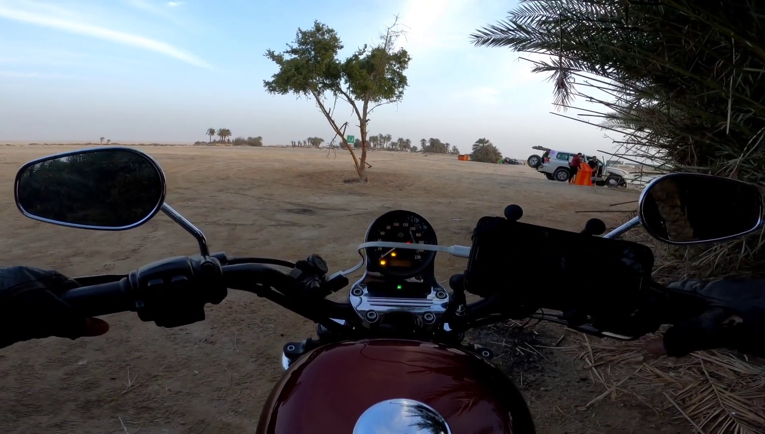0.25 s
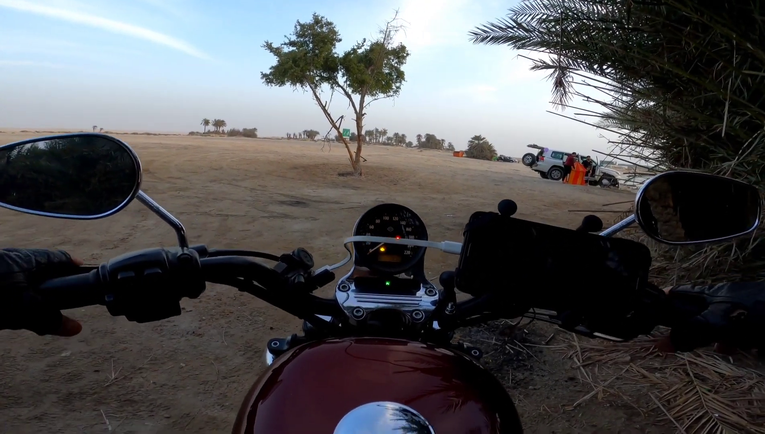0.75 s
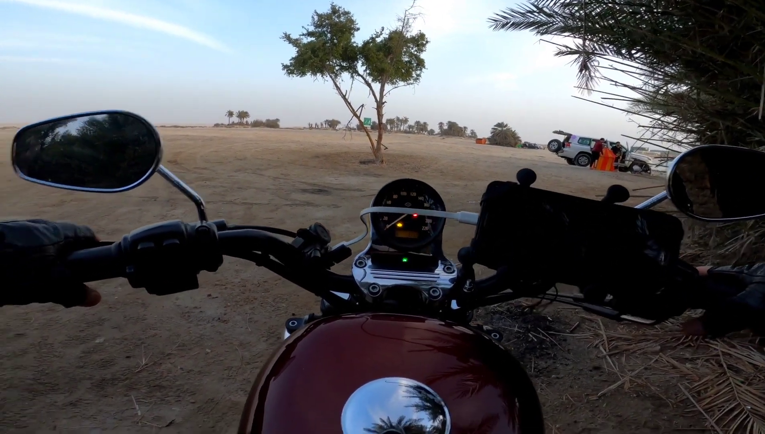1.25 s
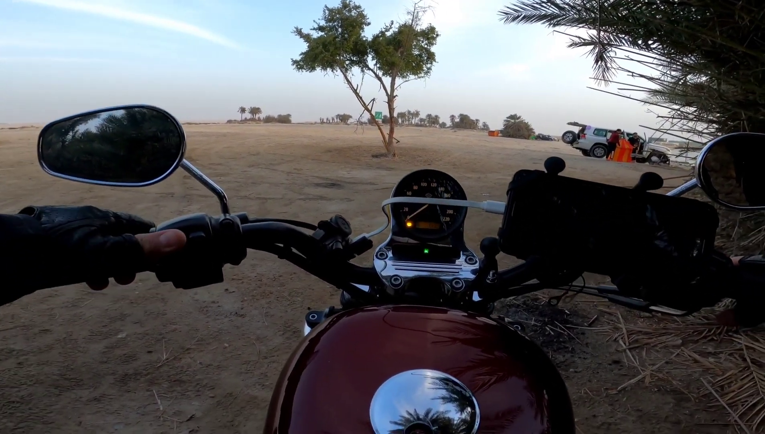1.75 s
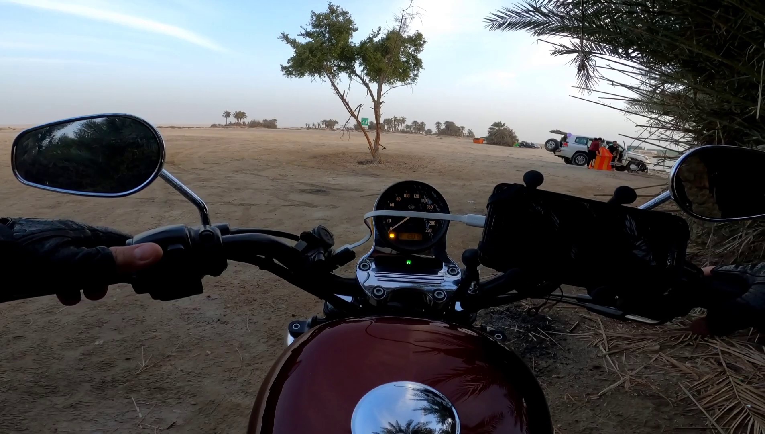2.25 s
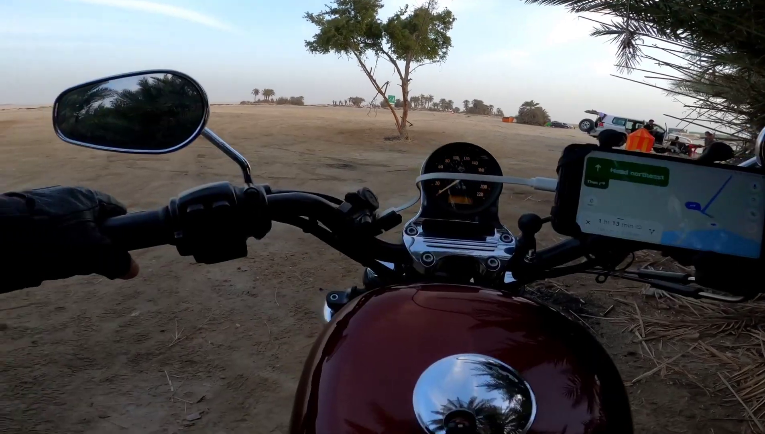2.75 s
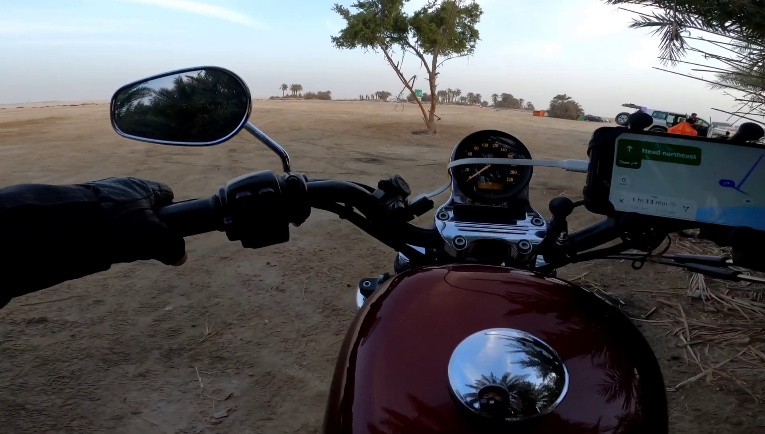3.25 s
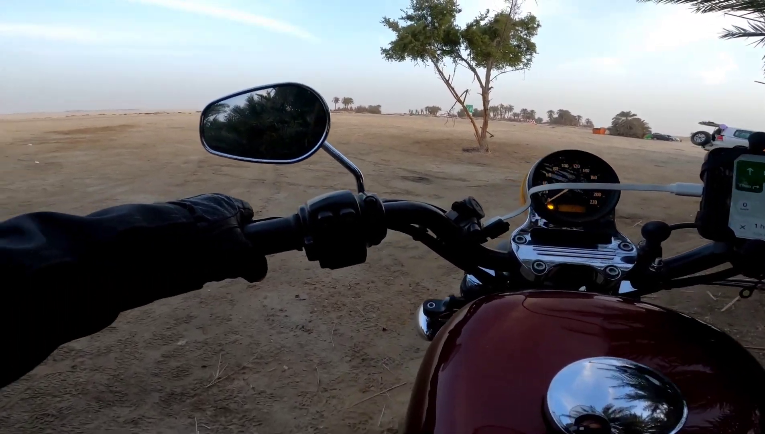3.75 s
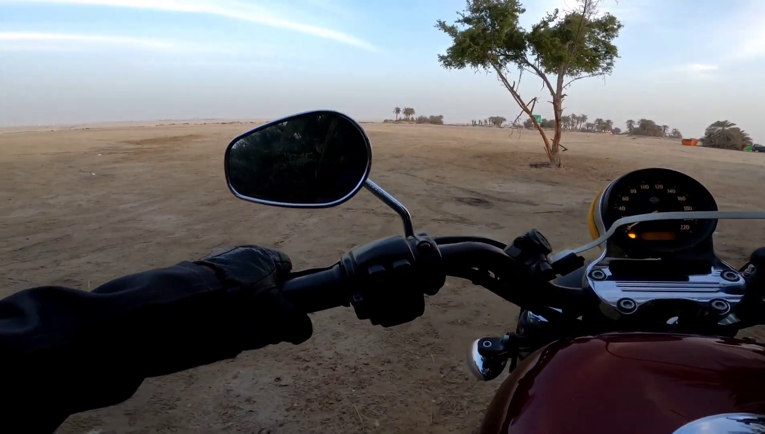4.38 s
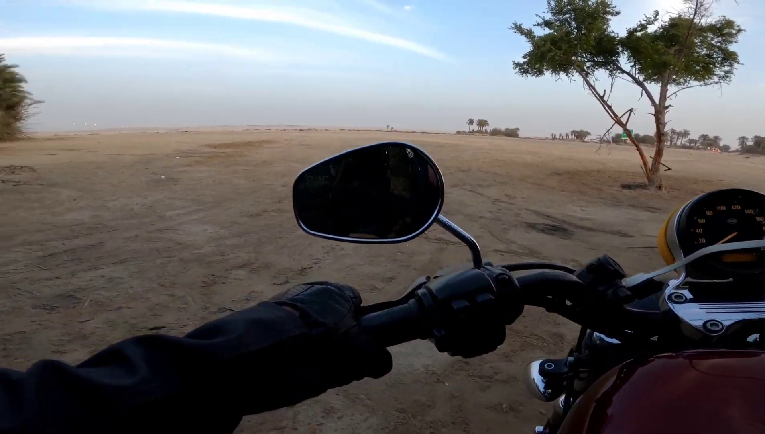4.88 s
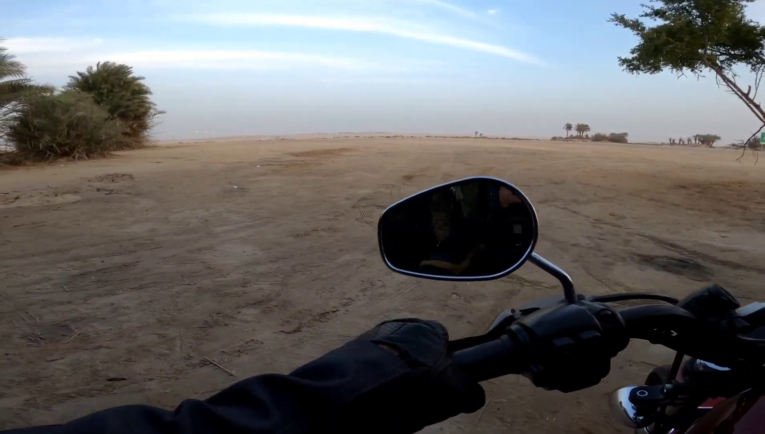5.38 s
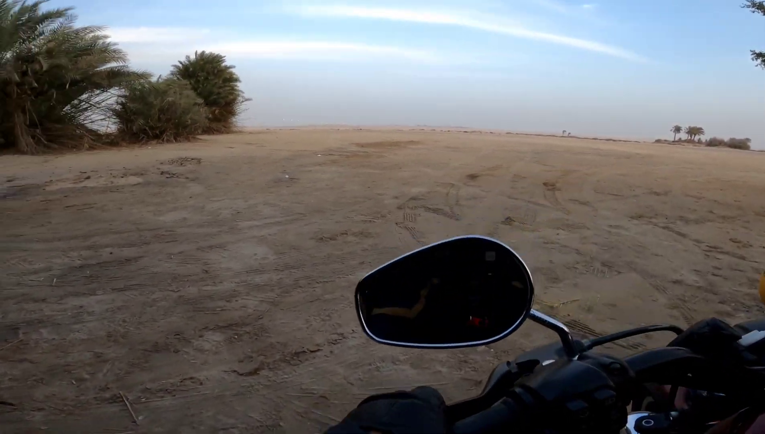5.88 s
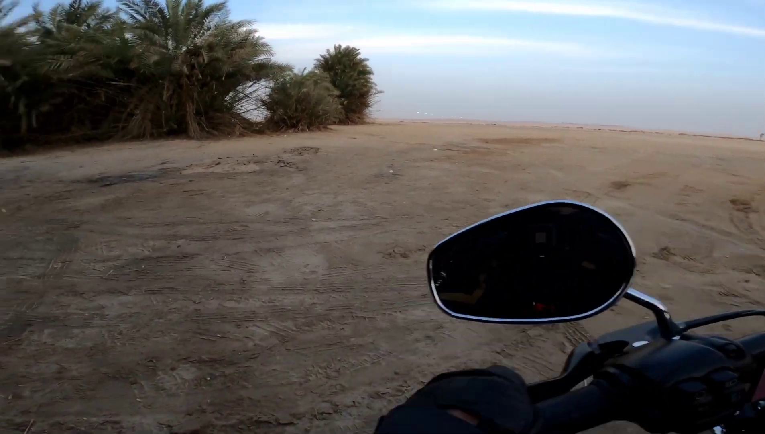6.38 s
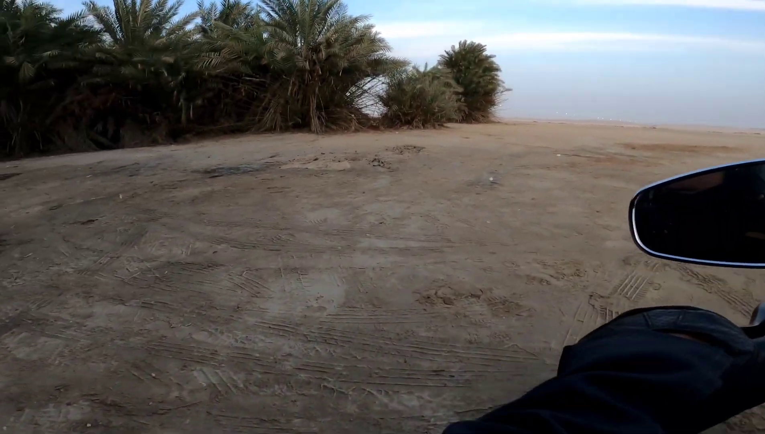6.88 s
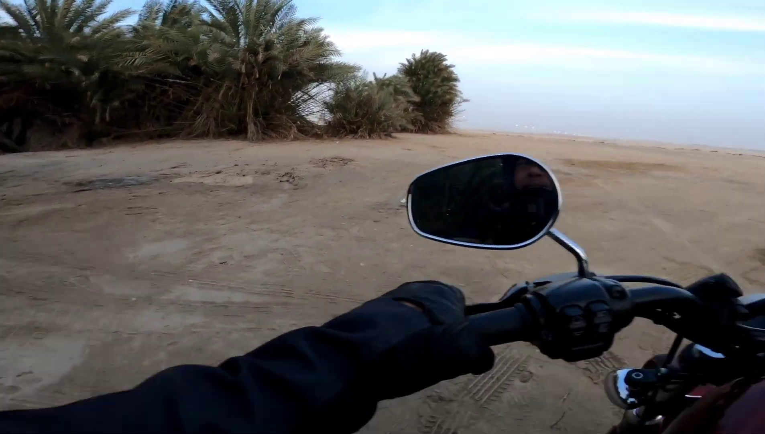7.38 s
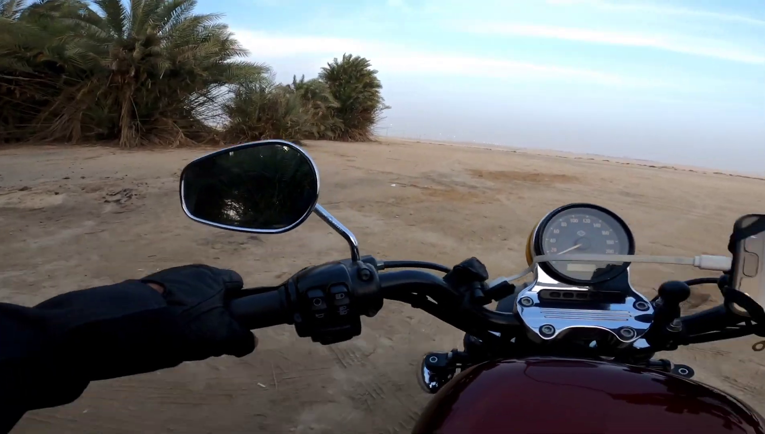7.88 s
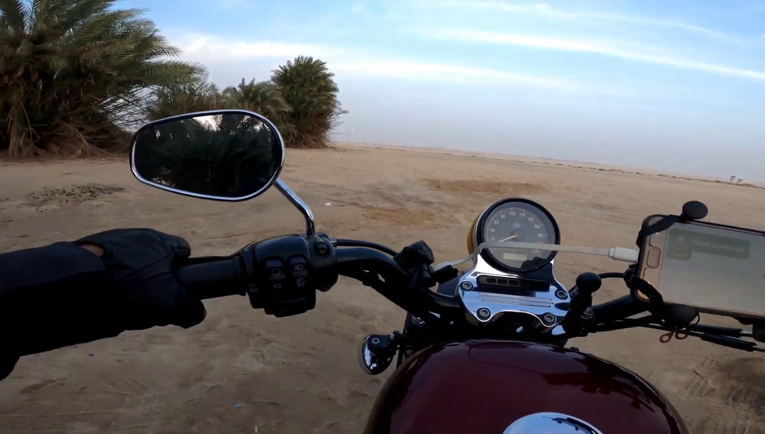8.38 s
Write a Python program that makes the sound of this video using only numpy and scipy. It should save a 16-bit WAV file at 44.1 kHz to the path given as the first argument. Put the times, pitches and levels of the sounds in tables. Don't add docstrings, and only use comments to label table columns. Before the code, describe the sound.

Close helmet perspective on a large twin-cylinder motorcycle in dry open air. At 0 seconds the starter cranks with a thin whirr; around 0.15-0.2 the pinion clanks in a quick cluster of bounces. The engine catches by 0.35, flares to its fastest near 0.75, then eases into a loud, lumpy idle until 2.67: deep uneven exhaust thuds, air gulps, rattling cases, ringing fins and a few skipped beats. A gap of about a hundredth of a second marks a scene change. The engine returns slightly quieter, swelling with a growl near 3.7, falling back by 4.4, then wavering. Misfires cluster from 4.3 to 5.6. It dips near 5.55, surges at 6.3, and rises again near 8.0 before settling. Bright valve hiss strengthens toward 7 while the bark softens, then reverses. Faint loose-part knocks and one grit tick dot the ride, which stops abruptly at about 8.6.

```python
import sys
import numpy as np
from scipy import signal
from scipy.fft import rfft, irfft
from scipy.io import wavfile
from scipy.ndimage import uniform_filter1d

SR = 44100
rng = np.random.default_rng(int(sys.argv[2]) if len(sys.argv) > 2 else 0)


def bounce(signal):
    frames = np.transpose(np.atleast_2d(signal))
    limited = np.clip(frames, -1, 1)
    pcm = np.round(limited * 32767).astype(np.int16)
    wavfile.write(sys.argv[1], SR, pcm)


def nominal_scale(level):
    x = np.asarray(level, float) / 20
    return 10 ** x


N = 381024
T = np.arange(N) / SR
CUT_S = 2.6718
SECOND_CYLINDER = .445

# (time [s], speed [four-stroke cycles/s])
START_SPEED = [
    (-.04, 5.615),
    (.34, 16.333),
    (.757, 18.071),
    (1.411, 15.861),
    (2.68, 14.121),
]
# (time [s], speed [four-stroke cycles/s])
RIDE_SPEED = [(2.642, 13.455), (3.19, 13.221), (3.67, 18.015), (4.03, 14.71), (4.41, 13.089),
              (4.57, 15.405), (5.03, 15.036), (5.23, 16.988), (5.55, 12.282), (6.14, 16.021),
              (6.31, 18.602), (6.67, 14.081), (7.06, 13.817), (7.26, 15.799), (7.55, 15.502),
              (7.98, 17.246), (8.2, 13.484), (8.66, 13.733)]


def ring(modes):
    t = T[:SR // 4]
    return sum(gain * np.sin(2 * np.pi * hz * t) * np.exp(-np.log(1000) * t / t60) for hz, gain, t60 in modes)


def ring_db(modes):
    return ring([(hz, nominal_scale(db), t60) for hz, db, t60 in modes])


def strike(times, sizes, response):
    blows = np.zeros(N + SR)
    np.add.at(blows, np.clip((times * SR).astype(int), 0, N), sizes)
    return signal.fftconvolve(blows, response)[:N]


def walk(rate):
    hold = int(SR / rate)
    levels = np.repeat(rng.standard_normal(N // hold + 1), hold)
    return 1.2 * uniform_filter1d(levels, hold)[:N]


def coloured(x, hz, power):
    ceps = irfft(.5 * np.log(power + 1e-14))
    ceps[1:len(ceps) // 2] *= 2
    ceps[len(ceps) // 2 + 1:] = 0
    y = signal.oaconvolve(x, irfft(np.exp(rfft(ceps))))[:N]
    return y / np.std(y)


def crank():
    margin = SR // 5
    long = np.arange(-margin, N + margin) / SR
    phases = []
    for curve, start_cycles in ((START_SPEED, -.386), (RIDE_SPEED, -1.023)):
        spun = np.cumsum(np.interp(long, *np.transpose(curve))) / SR
        phases.append(spun - np.interp(curve[0][0], long, spun) + start_cycles)
    cycles = np.arange(-3, 120)
    slots = np.sort(np.r_[cycles, cycles + SECOND_CYLINDER])
    first, second = (np.interp(slots, phase, long) for phase in phases)
    early = (first > 0) & (first < CUT_S)
    late = (second > CUT_S - .02) & (second < N / SR)
    turns = np.where(long < CUT_S, *phases)[margin:margin + N]
    times = np.r_[first[early], second[late]]
    rear = np.r_[slots[early], slots[late]] % 1 > 0
    return turns, times, rear


def misfired(times):
    # (first [s], firings lost [count], step [firings])
    misfire_runs = [(.441, 5, 4), (1.069, 4, 4), (2.018, 4, 4), (2.677, 1, 1), (4.296, 3, 1), (4.648, 3, 1),
                    (4.911, 3, 1), (5.23, 3, 1), (5.392, 2, 1), (5.574, 1, 1), (6.367, 1, 1), (6.483, 1, 1),
                    (6.581, 2, 1), (6.966, 1, 1), (7.989, 2, 1), (8.114, 2, 1), (8.479, 1, 1)]
    lost = np.zeros(len(times), bool)
    for s, count, step in misfire_runs:
        lost[np.argmin(np.abs(times - s)) + step * np.arange(count)] = True
    return lost


def exhaust(times, rear, skipped, bark_db, growl_db, rear_db=1.8, scatter_db=.5, suck=.03):
    # (frequency [Hz], signed gain [ratio], t60 [s])
    pipe_modes = [(47.6, -.456, .059), (93.3, 1.675, .0295), (141.9, -2.0, .0306), (161.8, .891, .037),
                  (275.6, .067, .057)]
    # (frequency [Hz], level [dB], t60 [s])
    bark_modes = [(270.5, -20, 0.022), (298.4, -25, 0.051), (384.3, -25.5, 0.076), (485, -34.5, 0.098)]
    fired = nominal_scale(rear_db * (rear - 1.5) + scatter_db * rng.standard_normal(len(times)))
    blow = np.where(skipped, -suck, fired)
    boom = strike(times - .0083, blow, ring(pipe_modes))
    bark = strike(times - .004, blow * nominal_scale(bark_db), ring_db(bark_modes[:2]))
    growl = strike(times - .004, blow * nominal_scale(bark_db + growl_db), ring_db(bark_modes[2:]))
    return boom + bark + growl


def intake(turns, revs, failing, rear_db=1.0):
    # (order [pulses/cycle], position of one crest [cycles], level [dB])
    throb_orders = [(3, .12, -11), (4, .052, -7), (9, .04, -12), (15, .98, -18), (16, .98, -15),
                    (18, .98, -9.5), (20, .024, -15)]
    gulps = 0
    for start, db in ((0, 0), (SECOND_CYLINDER, rear_db)):
        lag = (turns - start) % 1
        ripple = .25 * np.cos(2 * np.pi * (lag - .1) / .105)
        draw = np.clip((lag - .03) / .07, 0, 1) * (.35 + 3 * lag + ripple)
        shut = 1 / (1 + np.exp(-(lag - .228) / .012))
        slam = shut * np.exp(-(lag - .25) / .13) * np.cos(2 * np.pi * (lag - .265) / .27)
        pump = np.exp(-(((lag + .5) % 1 - .49) / .045) ** 2)
        size = nominal_scale(db + .8 * rng.standard_normal(200))[np.floor(turns - start).astype(int) % 200]
        gulps = gulps + size * (1.3 * slam - draw * (1 - shut)) + .7 * pump
    throb = 0
    for order, crest, db in throb_orders:
        level = nominal_scale(db - 19 * failing * (order > 9))
        throb = throb + level * np.cos(2 * np.pi * order * (turns - crest))
    return 0.09 * (gulps + throb) * nominal_scale(.8 * np.minimum(revs, 0))


def impacts(turns, column, steady_db, rate, spread_db, flicker_db):
    # (position [cycles], length [cycles], case level [dB], fin level [dB], valve gear level [dB])
    seatings = [
        (.0, 0.054, -7, -15, 8),
        (.15, 0.27, 3, -17, -14),
        (.30, 0.025, -14, 1, -0.5),
        (.45, 0.089, -8, -23, 6),
        (0.619, 0.0058, -9, 9.5, 5),
        (.70, 0.034, 8, 6, 10.5),
        (.88, 0.038, -2, -15.5, -4),
    ]
    crowd = nominal_scale(steady_db) ** 2
    for seating in seatings:
        lag = turns - seating[0] + .5
        size = nominal_scale(seating[column] + rng.standard_normal(200))[np.floor(lag).astype(int) % 200]
        crowd = crowd + size ** 2 * np.exp(-((lag % 1 - .5) / seating[1]) ** 2)
    hits = rng.random(N) < rate / SR
    grains = hits * rng.standard_normal(N) * nominal_scale(spread_db * rng.exponential(size=N))
    texture = grains / np.std(grains) + 1.24 * rng.standard_normal(N)
    return np.sqrt(crowd) * nominal_scale(flicker_db * walk(9.2)) * texture


def clatter(turns, revs, head, case_db, fin_db, valve_db):
    # (frequency [Hz], density [dB/Hz])
    case_colour = [(120, -35), (200, 7.5), (274, 0), (347, -8), (387, -7), (490, -6), (535, -14),
                   (658, -6.5), (762, -13.5), (825, -7.5), (1040, -5), (1260, -17), (1420, -31),
                   (1560, -26.5), (2100, -37), (2730, -55), (4620, -120)]
    # (frequency [Hz], width [Hz], level [dB])
    fin_peaks = [(1928, 14, 3.5), (2190, 57, -13), (2474, 41, 6), (2662, 72, 12), (2846, 72, -2.5),
                 (3102, 240, 2), (3460, 38, -6), (4115, 34, -14.5), (4790, 51, -14)]
    # (frequency [Hz], width [Hz], level [dB])
    valve_peaks = [(5230, 1500, -7), (7070, 72, 0.5), (7700, 280, -1.5), (8325, 130, 2.5), (9520, 830, -11),
                   (10230, 200, -14.5)]
    hz = np.arange(4097) * SR / 8192 + 1e-3

    def peaks(table):
        return sum(nominal_scale(db) ** 2 / (1 + (2 * (hz - f) / w) ** 2) ** 1.23 for f, w, db in table)

    def facing_db(swell_db, facing, beam):
        return swell_db * np.exp(-((head - facing) / beam) ** 2)

    case_hz, density_db = np.transpose(case_colour)
    body = nominal_scale(np.interp(np.log(hz), np.log(case_hz), density_db, -90, -90)) ** 2
    body /= 1 + (380 / hz) ** 3
    fin_floor = nominal_scale(-17.0) ** 2 / (1 + (hz / 3600) ** 6) / (1 + (1500 / hz) ** 10)
    valve_floor = nominal_scale(-15.0) ** 2 / (1 + (4000 / hz) ** 8)

    rattle = impacts(turns, 2, steady_db=8.5, rate=2500, spread_db=1.0, flicker_db=0.5)
    case = coloured(rattle, hz, body)
    taps = impacts(turns, 3, steady_db=4.5, rate=1500, spread_db=1.67, flicker_db=0.99)
    fins = 0
    for k, facing in enumerate((0.36, 0.88, 0.32)):
        level_db = .7 * walk(3.18) + facing_db(3.5, facing, .11) + 0.18 * revs * (3 - k)
        fins = fins + nominal_scale(level_db) * coloured(taps, hz, peaks(fin_peaks[k::3]) + fin_floor / 3)
    seats = impacts(turns, 4, steady_db=-0.5, rate=4300, spread_db=0.2, flicker_db=0.9)
    valves = 0
    for k, facing in enumerate((.95, .45, .25)):
        level_db = .7 * walk(4) + facing_db(5, facing, .18)
        valves = valves + nominal_scale(level_db) * coloured(seats, hz, peaks(valve_peaks[k::3]) + valve_floor / 3)
    return nominal_scale(case_db + 1.0) * case + nominal_scale(fin_db - 6) * fins + nominal_scale(valve_db - 9.5) * valves


def knocks(rattle_s=0.00404):
    # (time [s], blow [dB], treble [dB])
    knock_events = [(0.1506, -20, -1), (.153, -15.5, 1.5), (0.162, -29, -10), (.2, -27, -9),
                    (.209, -31, -12), (1.343, -27, -2), (2.39, -29, -9), (3.233, -29, -10),
                    (5.885, -34, -6), (6.275, -29, 1.5), (6.784, -32, -8), (6.847, -36, 2),
                    (7.268, -38, -7)]
    # (frequency [Hz], level [dB], t60 [s])
    frame_modes = [(678, -1, 0.036), (967, 4.5, 0.057), (1050, -0.5, 0.048), (1340, -8, .014),
                   (1930, -21.5, 0.085), (2613, 1, 0.012), (3180, -8, .012), (5300, -21, .006),
                   (7700, -24, 0.056)]
    s, db, treble_db = np.transpose(knock_events)
    lags = rng.exponential(size=(len(s), 10)) * rattle_s
    lags[:, 0] = 0
    times = (s[:, None] + lags).ravel()
    sizes = nominal_scale(db)[:, None] * rng.choice([-1, 1], lags.shape) * np.exp(-lags / rattle_s / 1.8)
    treble_sizes = sizes * nominal_scale(treble_db)[:, None]
    low = ring_db(frame_modes[:4])
    high = uniform_filter1d(ring_db(frame_modes[4:]), size=3)
    grit = ring([(4570, 0.67, 0.0065), (6350, .8, .005), (8200, 0.7, 0.0046), (10300, .4, 0.0044)])
    thuds = strike(times, sizes.ravel(), low)
    clicks = strike(times, treble_sizes.ravel(), high)
    return thuds + clicks + strike(np.array([5.6895]), nominal_scale(-27.5), grit)


def scene():
    # (time [s], head turn [0-1])
    head_turn = [
        (0, 0),
        (3.0, 0.17),
        (4.3, 0.28),
        (4.62, 0.27),
        (5.6, 0.57),
        (6.3, .7),
        (7.05, 1),
        (7.8, 0.44),
        (8.64, 0.33),
    ]
    turns, times, rear = crank()
    skipped = misfired(times)
    speed = np.where(T < CUT_S, *(np.interp(T, *np.transpose(c)) for c in (START_SPEED, RIDE_SPEED)))
    revs = np.clip(speed, 8, 19) - 15
    head = np.interp(T, *np.transpose(head_turn))
    failing = np.interp(T, times + .015, skipped)

    # dB at idle, extra dB while starting, dB per cycle/s of revs, dB at full head turn, dB in a misfire
    controls = np.array([np.ones(N), T < CUT_S, np.maximum(revs, -3), head, failing])
    case_db = np.array([-26, 4, 0.71, -3, -1.5]) @ controls
    fin_db = np.array([-38, 3.5, 0.25, -1.2, -0.5]) @ controls
    valve_db = np.array([-51.5, 4.5, 0.48, 6, -1.5]) @ controls
    breath_db = np.array([-13.5, 4.5, 0.2, 0.54, 2.7]) @ controls

    asleep_db = -1.5 * np.clip(1 - T / .13, 0, 1)
    starter_db = 11 * np.exp(-T / .29)
    bark_db = np.interp(times, T, 0.37 * revs - 3 * head)
    gain_of_revs = uniform_filter1d(np.gradient(speed), size=4000) * SR
    pull = np.clip(gain_of_revs / 5.2, 0, 1) * (1 - head) * np.clip(revs / 3, 0, 1) * (T > CUT_S)
    growl_db = 11 * np.interp(times, T, pull)

    air = exhaust(times, rear, skipped, bark_db, growl_db) + intake(turns, revs, failing)
    breath = nominal_scale(breath_db + 15.5) * air
    metal = clatter(turns, revs, head, case_db + asleep_db, fin_db + asleep_db, valve_db + starter_db)
    return (breath + metal + knocks())[None]


def band_limit(x):
    return signal.sosfilt(signal.butter(12, 12250, fs=SR, output="sos"), x)


def record(dry):
    gap_s, fade_s = .009, .006
    cut = signal.sosfilt(signal.butter(1, 12, "high", fs=SR, output="sos"), dry)
    overload = np.tanh(0.94 * cut) / 0.84
    soft = signal.sosfilt(signal.butter(10, 10700, fs=SR, output="sos"), overload)
    fade_in = np.clip((T - CUT_S - gap_s) / fade_s, .004, 1)
    fade_out = np.clip((T[-1] - T) / 0.0018, 0, 1)
    return band_limit(soft * np.where(T < CUT_S, 1, fade_in) * fade_out)


dry = scene()
out = record(dry)
bounce(out)
```